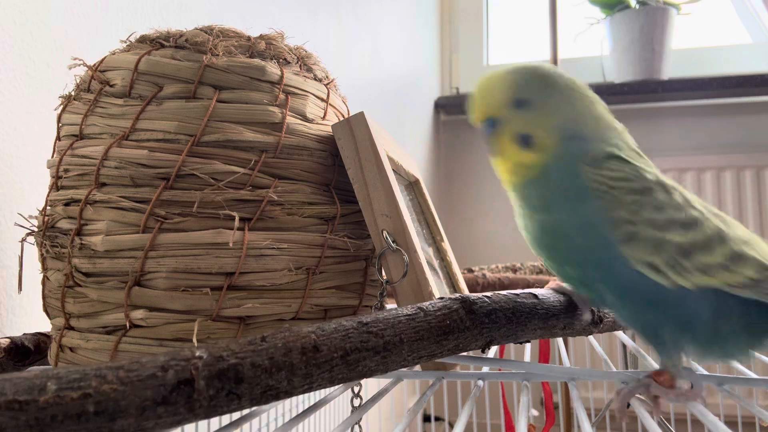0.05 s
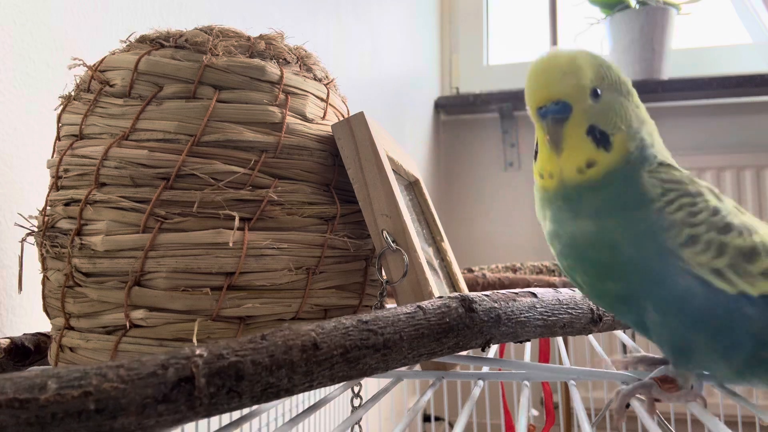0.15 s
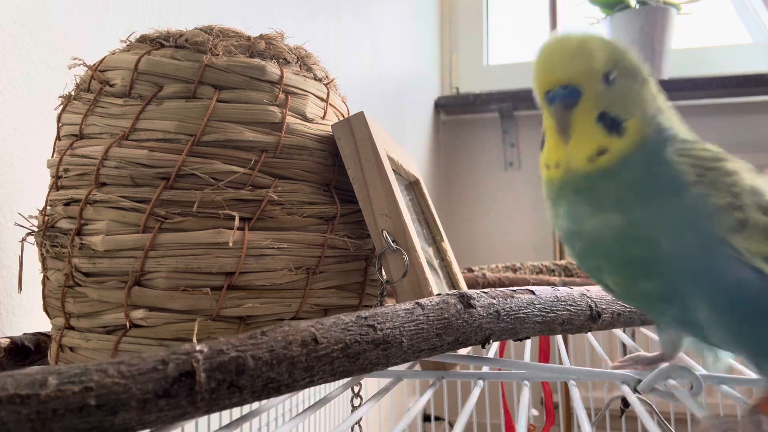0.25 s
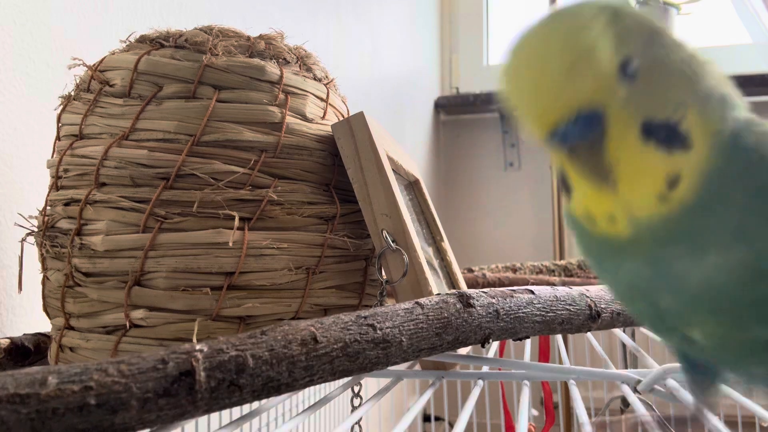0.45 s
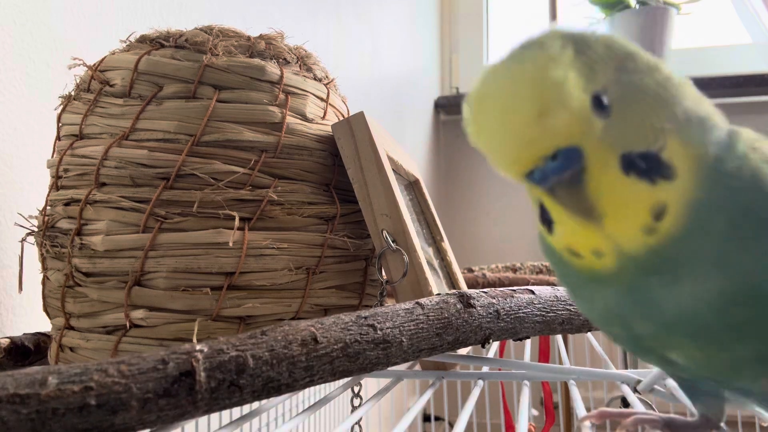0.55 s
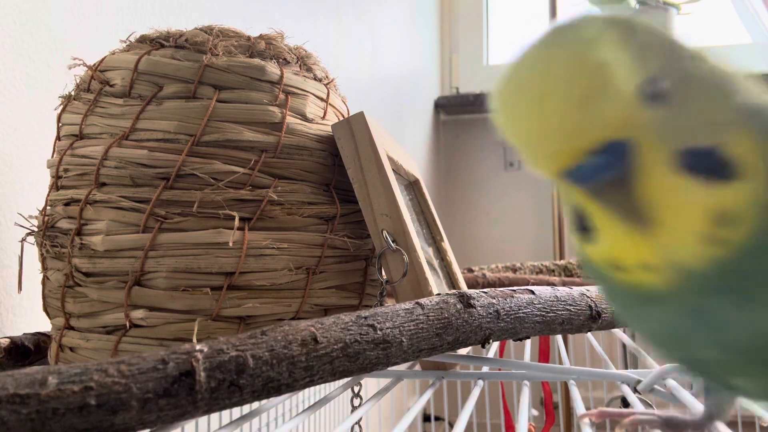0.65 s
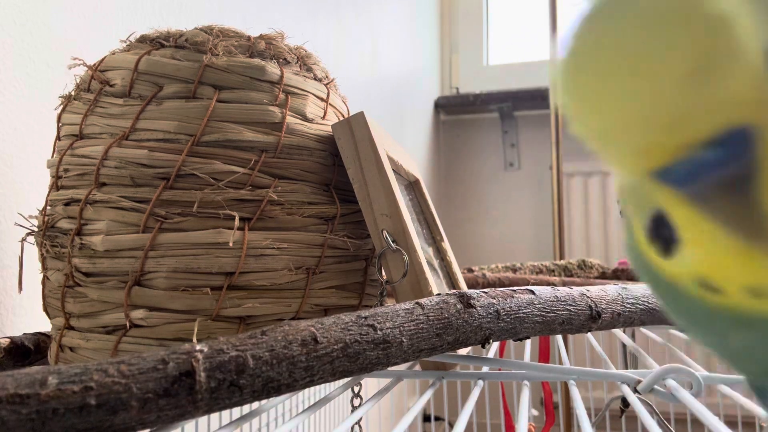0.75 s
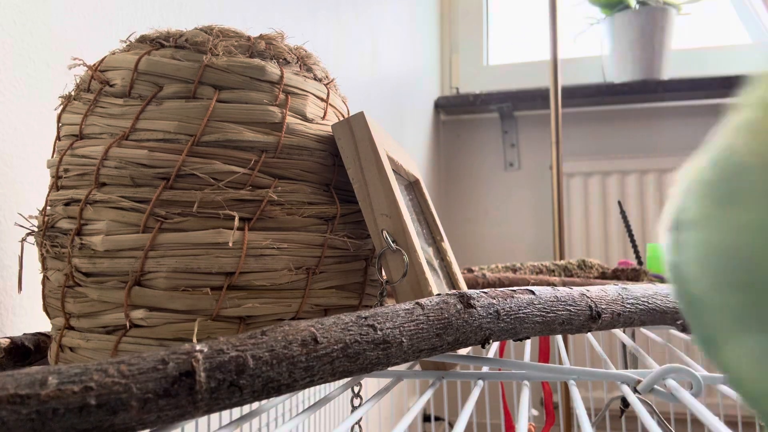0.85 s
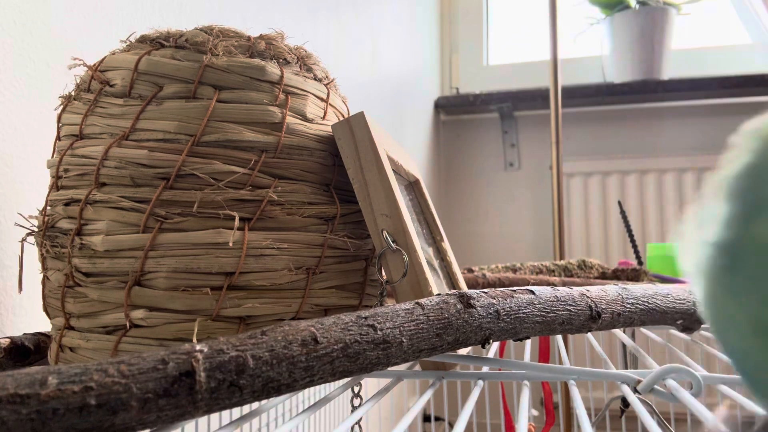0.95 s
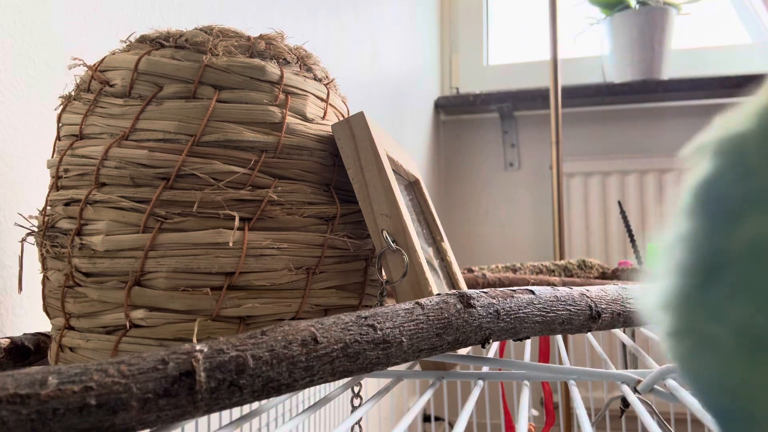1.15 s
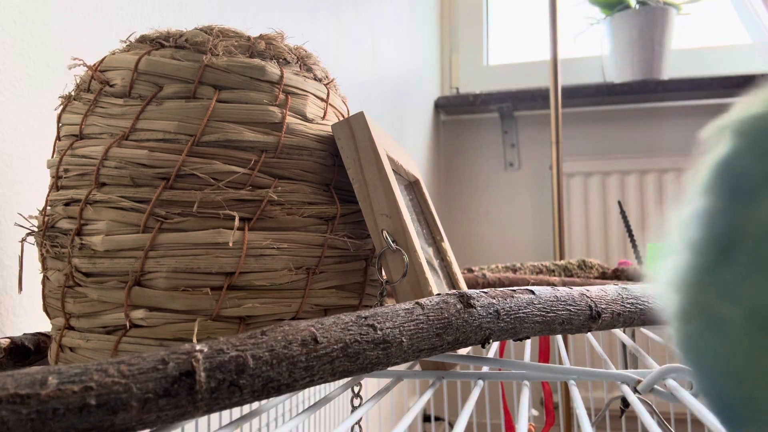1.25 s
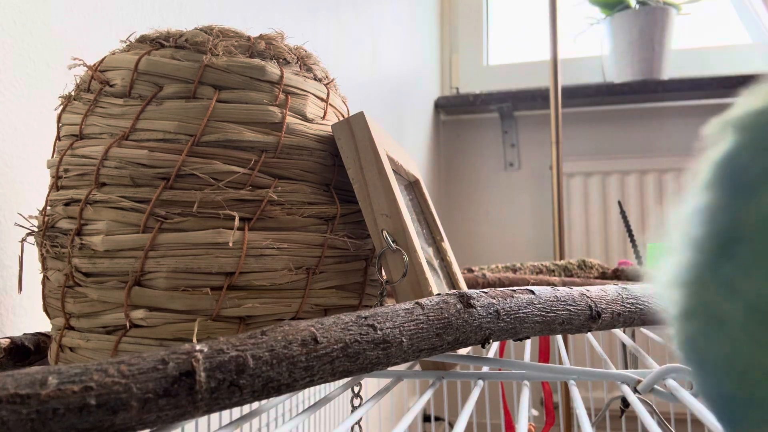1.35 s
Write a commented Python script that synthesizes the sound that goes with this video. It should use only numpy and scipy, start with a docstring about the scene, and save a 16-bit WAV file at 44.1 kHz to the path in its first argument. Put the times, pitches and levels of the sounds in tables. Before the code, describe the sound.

A budgie steps along its perch and wire cage with light clicks and one quick chirp.

```python
"""In a small quiet room, a budgie steps along a wooden perch on a wire cage, up to a phone on the bars.
Its feathers rustle as fluttering noise, and each footfall excites the damped modes of perch, frame,
wires and bars. It gives one quick warbled chirp, a gliding harmonic tone filtered by throat and beak.
The room reverberates, and a low rumble lasts while the bird moves, over the noise of still air."""
import sys
import numpy as np
from scipy import signal
from scipy.fft import rfft, irfft, next_fast_len
from scipy.io import wavfile

SR = 44100
rng = np.random.default_rng(int(sys.argv[2]) if len(sys.argv) > 2 else 0)


def put_to_file(sound):
    """Save the sound as 16-bit audio at rate SR, in the file named by the first command-line argument."""
    columns = np.atleast_2d(sound).T  # one column per channel
    safe = np.clip(columns, -1, 1)
    whole_steps = np.round(safe * 32767)
    wavfile.write(sys.argv[1], SR, whole_steps.astype(np.int16))


N = 61739
T = np.arange(N) / SR
RING_N = int(.6 * SR)  # samples in one footfall


def undb(db):
    """Amplitude ratio of a level in decibels."""
    return 10 ** (np.asarray(db) / 20)


def unit(x):
    """Normalisation to an rms of 1."""
    return x / np.sqrt(np.mean(x ** 2))


def shape(x, points, law=undb):
    """Linear filtering by (Hz, value) points joined on a log-frequency axis."""
    hz, value = np.array(points, float).T
    n = x.shape[-1]
    size = next_fast_len(n + n // 20, True)
    f = np.maximum(np.fft.rfftfreq(size, 1 / SR), 1)
    response = law(np.interp(np.log(f), np.log(hz), value))
    return irfft(rfft(x, size) * response, size)[..., :n]


def decay(t60):
    """Exponential damping: 60 dB in t60 seconds."""
    return np.exp(-np.log(1000) * T / t60)


def wander(hz):
    """Random modulation: noise of rms 1, low-passed at hz / 2."""
    return unit(signal.sosfilt(signal.butter(2, hz / 2, fs=SR, output="sos"), rng.standard_normal(N)))


def gate(start, length, edge_s):
    """A window with raised-cosine edges."""
    return np.sin(np.pi / 2 * np.clip(np.minimum(T - start, start + length - T) / edge_s, 0, 1)) ** 2


def wide_noise(side):
    """Partly correlated stereo noise: mid plus and minus a weighted side."""
    m, s = rng.standard_normal((2, N))
    return np.array([m + side * s, m - side * s])


# Each row: frequency in Hz, side minus mid in dB.
FIELD_WIDTH = [(30, -11), (60, -11.5), (125, -6), (250, -1), (600, 3), (3000, -5), (9000, -9.5),
               (14000, -5)]
def diffuse(spectrum):
    """A diffuse field: coloured noise from all around, narrower in the bass."""
    mid, side = rng.standard_normal((2, N))
    side = shape(side, FIELD_WIDTH)
    return unit(shape(np.array([mid + side, mid - side]), spectrum))


# Each row: frequency in Hz, relative spectral density in dB.
AIR_SPECTRUM = [(20, -12), (45, -2), (110, 1), (250, -6.5), (500, -13.5), (900, -11.5), (1600, -14.5),
                (2800, -20), (5000, -41.5), (11000, -35), (14000, -37.5), (16000, -60.5)]
def room_air():
    """Stationary noise: the floor of the still room."""
    return undb(-62) * diffuse(AIR_SPECTRUM)


# Each row: frequency in Hz, relative spectral density in dB.
RUMBLE_SPECTRUM = [(25, -25.5), (42, -6.5), (95, -2.5), (160, -9), (280, -17), (600, -19), (1200, -32.5),
                   (4000, -61.5)]
# Each row: time in seconds, level in dB.
RUMBLE_ENVELOPE = [(0, -54), (.3, -53), (.5, -50.5), (.85, -53.5), (.92, -63.5), (1.4, -94.5)]
def rumble():
    """Low noise under a slow envelope, lasting while the bird walks."""
    level_db = np.interp(T, *np.array(RUMBLE_ENVELOPE).T)
    return diffuse(RUMBLE_SPECTRUM) * undb(level_db)


# Each row: start in seconds, length in seconds, level in dB.
RUSTLES = [(-0.02, .155, -54.5), (0.114, .10, -66.5), (0.246, 0.13, -50.5), (0.377, 0.073, -42),
           (0.555, .26, -69), (1.278, .13, -71.5)]
# Each row: frequency in Hz, relative spectral density in dB.
FEATHER_SPECTRUM = [(300, -14), (1200, 6.5), (2500, 3.5), (5000, 0), (7500, -3.5), (11000, -2),
                    (14000, -5.5), (16000, -30.5)]
def feathers():
    """Amplitude-modulated noise: a soft hiss flutters as the bird shifts."""
    effort = sum(undb(db) * gate(start, length, edge_s=.02) for start, length, db in RUSTLES)
    hiss = unit(shape(wide_noise(side=0.67), FEATHER_SPECTRUM))
    flutter_db = 2 * wander(hz=89.5)
    return hiss * effort * undb(flutter_db)


def ring(modes, spread=0.026, count=5, rise_s=0.00023):
    """Modal superposition: each struck mode is a damped cluster whose detuned partials beat."""
    t, out = T[:RING_N], 0
    for hz, db, t60, pan in modes:
        detune, phase = rng.uniform(-1, 1, (2, count, 1))
        offsets = (2 * np.arange(count)[:, None] + 1 + detune) / count - 1
        angles = 2 * np.pi * hz * (1 + spread * offsets) * t + np.pi * phase
        cluster = np.sin(angles).sum(axis=0)
        gains = undb(db + np.array([[pan], [-pan]]) / 2)
        out = out + gains * cluster * decay(t60)[:RING_N]
    return out * (1 - np.exp(-t / rise_s)) / np.sqrt(count)


# Each row: frequency in Hz, relative spectral density in dB, left minus right in dB.
CONTACT_SPECTRUM = [(97, -24.5, -7), (700, -26, -1.5), (950, 3, 2.5), (1560, 0, 19.5), (2480, 1, 0),
                    (3240, -2, 1.5), (4650, -2.5, -3.5), (6500, -7, -0.5), (7200, 3.5, -1.5),
                    (8730, -16.5, -1), (11000, -4.5, 0.5), (12740, -12.5, -1), (14400, -1, -0.5),
                    (15700, -21, 4)]
def contact_noise():
    """Broadband noise of foot contact and rattling bars, coloured differently on each side."""
    channels = [shape(noise, [(hz, db + sign * pan / 2) for hz, db, pan in CONTACT_SPECTRUM])
                for noise, sign in zip(wide_noise(side=0.75), (1, -1))]
    return unit(np.array(channels))


# Short modes of perch and frame, long modes of the wires and of the cross bars.
# Each row: frequency in Hz, relative level in dB, 60 dB decay time in seconds, left minus right in dB.
FRAME_MODES = [(1003, -8.5, 0.058, 12.5), (1119, -18.5, 0.18, 1.5), (1404, -0.5, 0.047, 11.5),
               (1618, 0.5, 0.042, 15), (1769, -5, 0.035, 18), (2151, -15.5, 0.024, 43.5),
               (4183, 3.5, .04, 2), (7040, -6, 0.05, -1.5), (10070, -18, .03, 2), (13780, 7, 0.024, -1.5),
               (14350, 5, 0.033, 3.5)]
WIRE_MODES = [(1240, -29.5, 0.3, 13.5), (1456, -21.5, 0.54, 18), (1582, -21, 1, 9.5), (2057, -32, .27, 0),
              (3410, -30.5, 0.77, -10), (4470, -14, 0.2, 7.5), (5060, -18, 0.2, 5.5),
              (7260, -23.5, 0.077, 0.5), (7400, -20.5, .17, -3.5)]
BAR_MODES = [(2947, -11, 0.25, 2.5), (3053, -7, 0.35, 1)]
# Each entry: frequency in Hz of the low knock, high knock, mids, treble and top tick in turn.
STEP_BANDS_HZ = [1100, 1700, 3800, 8500, 14000]
# Footfalls and claw taps. Each row: start in seconds, gains in dB at those five frequencies,
# then gains in dB of the scratch, the wires and the bars.
FOOTFALLS = [(0.002, -40, -48, -57.5, -66, -66.5, 0.5, 5, -14),
             (0.136, -43, -54, -72.5, -90, -91, 6, -16, -10.5),
             (0.195, -91, -54.5, -56.5, -52, -62, -13.5, 0.5, -20),
             (0.236, -44.5, -51.5, -55, -52, -74, 0, -10, -19),
             (0.247, -44.5, -23.5, -38.5, -27.5, -24, -7, 0.5, -15),
             (0.318, -53, -48, -56.5, -66, -73, -12, -5, 10),
             (0.405, -32, -32.5, -34.5, -26.5, -27, -1.5, -6, 4.5),
             (0.48, -41, -47.5, -45, -77, -65.5, 0.5, -2, -4),
             (0.563, -45, -58.5, -68, -55, -60.5, 0.5, 1, 17),
             (0.603, -61, -42, -45, -45.5, -46.5, -3, -21, -4),
             (0.661, -63, -58, -49, -50, -58, -20, -17, -10.5),
             (0.718, -43, -50.5, -59, -84, -73, -2, -4, -28),
             (0.731, -42.5, -49.5, -54.5, -70, -70, -2, -9, -23),
             (0.774, -71, -58, -59, -61, -65, 5, -11.5, -10),
             (0.795, -45.5, -46.5, -47, -58, -74, 6.5, -14, -11),
             (0.8006, -34.5, -30, -36, -31, -39.5, 1, 3, 2.5),
             (1.0171, -42, -44, -54, -84, -82, -0.5, -11, -5),
             (1.094, -54.5, -51, -52.5, -69, -64, -8, -12, -12),
             (1.302, -75, -66.5, -63.5, -74.5, -79, 6.5, -15.5, -8)]
def footfalls():
    """Impact excitation: each step cracks, rattles and rings the cage; thin bars radiate no bass."""
    out = np.zeros((2, N + RING_N))
    frame = undb(1) * ring(FRAME_MODES, spread=0, count=1)
    wires = undb(3.5) * ring(WIRE_MODES)
    bars = undb(3.5) * ring(BAR_MODES)
    crack, rattle = undb(4.5) * decay(t60=0.049), undb(-3.5) * decay(t60=.18)
    grit = contact_noise()
    for start, *band_db, scratch_db, wire_db, bar_db in FOOTFALLS:
        at = int(start * SR)
        scratch = (np.roll(grit, -at, axis=1) * (crack + rattle))[:, :RING_N]
        blow = frame + undb(scratch_db) * scratch + undb(wire_db) * wires + undb(bar_db) * bars
        out[:, at:at + RING_N] += shape(blow, list(zip(STEP_BANDS_HZ, band_db)))
    return signal.sosfilt(signal.butter(2, 950, "high", fs=SR, output="sos"), out[:, :N])


# Each row: frequency in Hz, relative gain of the reflections in dB.
ROOM_RESPONSE = [(200, 8.5), (1500, -3), (3000, 8), (3800, -1), (5500, 2), (7500, -7), (11500, -5.5),
                 (14000, -14.5)]
def reflections(x, t60, gap_s=0.0066):
    """Reverberation: convolution with a decaying noise tail of unit energy."""
    tail = shape(rng.standard_normal((2, N)), ROOM_RESPONSE) * decay(t60) * (T > gap_s)
    return signal.fftconvolve(x, unit(tail) / np.sqrt(N), axes=1)[:, :N]


# Each row: start and length in seconds, first, middle and last pitch in Hz, level in dB,
# swell over the syllable in dB, overtone gain in dB, roughness from 0 to 1.
SYLLABLES = [(0.305, .0165, 4760, 4010, 3960, -31, 8, 0.5, 0.1),
             (0.3167, 0.014, 3583, 3362, 3290, -33, -1.5, 3.5, 1),
             (0.329, 0.024, 3550, 2871, 3380, -29.5, 2.5, 0, 0.5),
             (0.347, 0.0062, 2400, 2033, 2150, -19, -6, -18.5, .4),
             (0.35, 0.019, 3700, 3505, 3350, -29, 1.5, 0, .7),
             (0.367, .0135, 4300, 4003, 3740, -20, -1, -3, .12),
             (0.383, .019, 4050, 2930, 3335, -16, 5.5, -2, 0.4),
             (0.402, .021, 3550, 3050, 2970, -25, 0, -14.5, 1),
             (0.41, 0.018, 4550, 4470, 4050, -32.5, -4, -13.5, .4),
             (0.423, 0.021, 3806, 3710, 3764, -18, -0.5, -7.5, 0),
             (0.436, 0.03, 3680, 3649, 3748, -14, -2, -8.5, .05)]
# Each row: harmonic number, relative level in dB.
OVERTONES = [(2, -13), (3, -17.5)]
# Breathy rasp, and the passband of throat and beak. Each row: frequency in Hz, relative gain in dB.
RASP_SPECTRUM = [(1000, -33), (1900, -3), (3000, 3), (4300, -5), (5300, -20.5), (7500, -11.5), (12000, -36)]
BEAK_RESPONSE = [(600, -15), (1500, -3.5), (9000, -1), (10500, -16), (12000, -19.5), (15000, -30)]
def chirp(jitter=0.03, shimmer_db=5.5):
    """Source and filter: raspy scoops of pitch, then a clean whistle, pass through throat and beak."""
    out, waver, shimmer = np.zeros(N), wander(hz=1000), wander(hz=1000)
    rasp = undb(-11) * unit(shape(rng.standard_normal(N), RASP_SPECTRUM))
    for start, length, first, middle, last, db, swell_db, bright_db, rough in SYLLABLES:
        on = (T >= start) & (T < start + length)
        progress = (T[on] - start) / length
        hz = np.polyval(np.polyfit([0, .5, 1], [first, middle, last], 2), progress)
        phase = 2 * np.pi * np.cumsum(hz * (1 + jitter * rough * waver[on])) / SR
        tone = np.sin(phase) + sum(undb(k_db + bright_db) * np.sin(k * phase) for k, k_db in OVERTONES)
        level_db = db + swell_db * (progress - .5) + shimmer_db * rough * shimmer[on]
        envelope = gate(start, length, edge_s=0.0038)[on] * undb(level_db)
        out[on] += (tone + rough * rasp[on]) * envelope
    return np.tile(shape(out, BEAK_RESPONSE), (2, 1))


# Each row: frequency in Hz, phase lead of the left port in radians.
PORT_PHASE = [(100, -4), (1200, 1.35), (2000, 1.28), (3000, 3.0), (3700, 4.5), (4200, 4.5), (6000, 8),
              (7400, 8), (9000, 7), (11500, 5), (14000, 4)]
def ports(x):
    """Phase difference: near sounds reach the two microphone ports out of step."""
    return np.array([x[0], shape(x[1], PORT_PHASE, lambda lead: np.exp(-1j * lead))])


def scene():
    """Superposition of direct sound from bird and cage, reflections and background noise."""
    feet, voice = footfalls(), chirp()
    room = reflections(undb(-12.5) * feet + undb(-28.5) * voice, t60=0.31)
    near_echoes = undb(-14) * reflections(voice, t60=.14)
    direct = ports(feet + voice + feathers())
    return direct + room + near_echoes + rumble() + room_air()


def record(dry):
    """Band limiting: the phone cuts the treble above 15.6 kHz."""
    return signal.sosfilt(signal.ellip(8, .2, 70, 15600, fs=SR, output="sos"), dry)


dry = scene()
out = record(dry)
put_to_file(out)
```